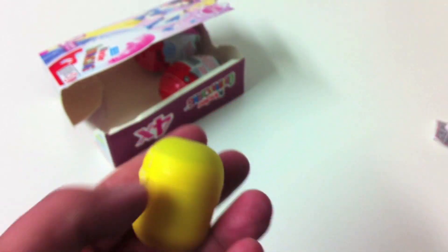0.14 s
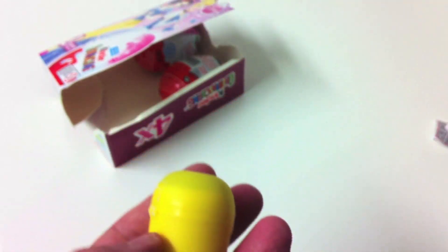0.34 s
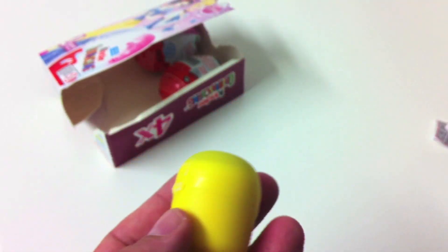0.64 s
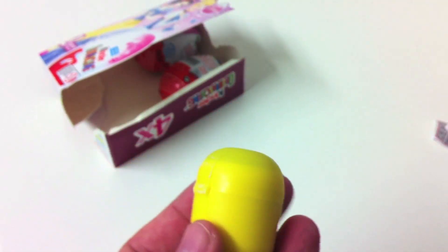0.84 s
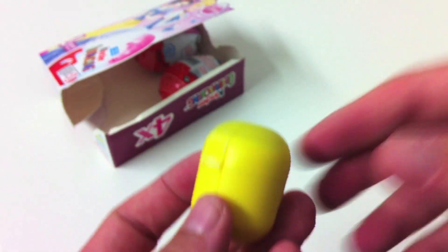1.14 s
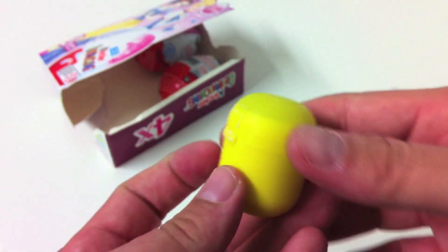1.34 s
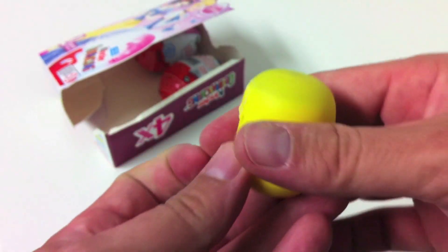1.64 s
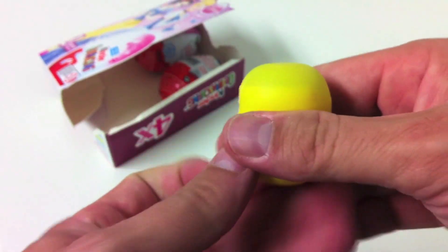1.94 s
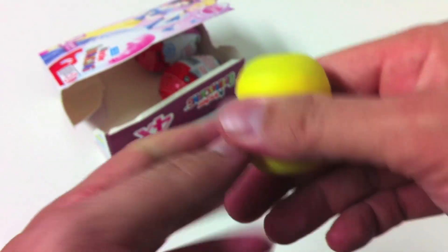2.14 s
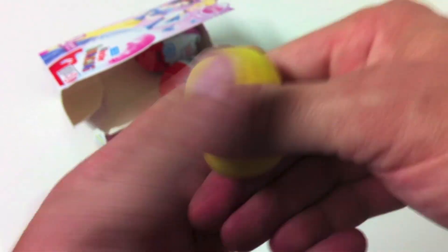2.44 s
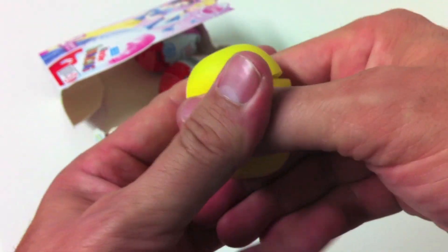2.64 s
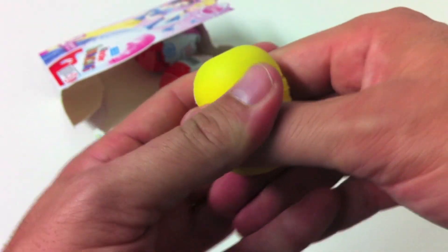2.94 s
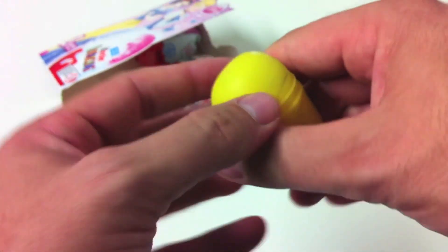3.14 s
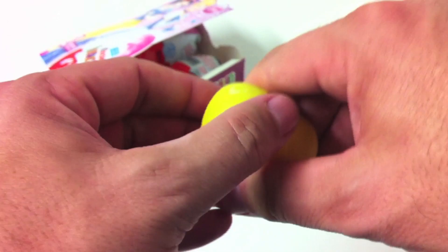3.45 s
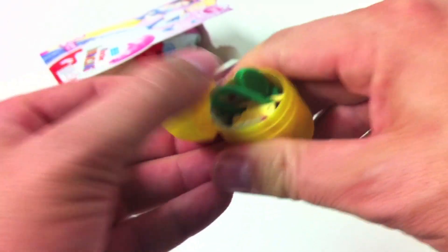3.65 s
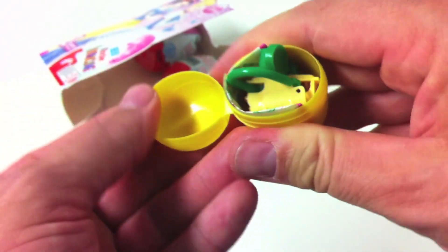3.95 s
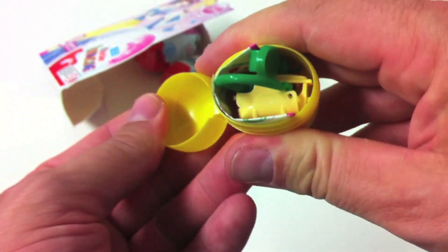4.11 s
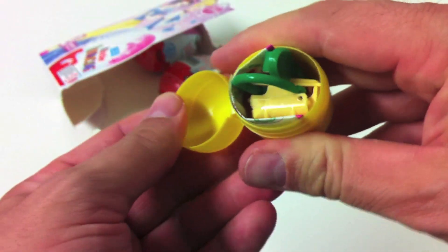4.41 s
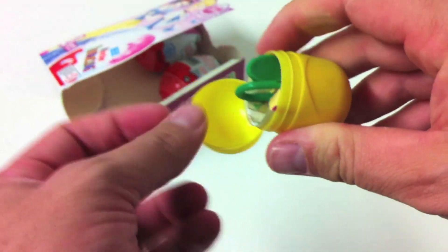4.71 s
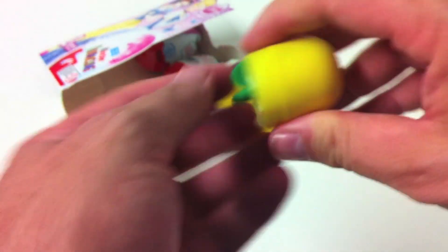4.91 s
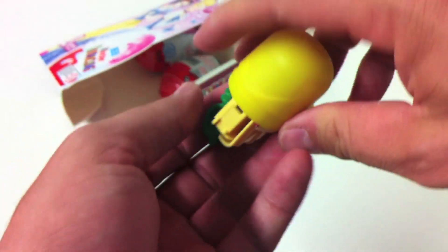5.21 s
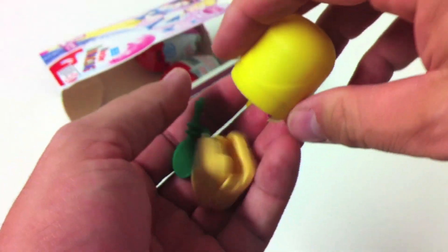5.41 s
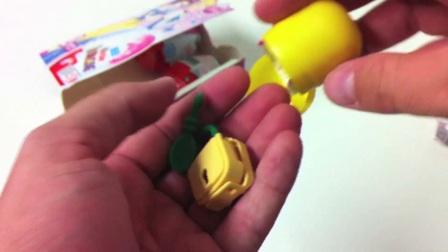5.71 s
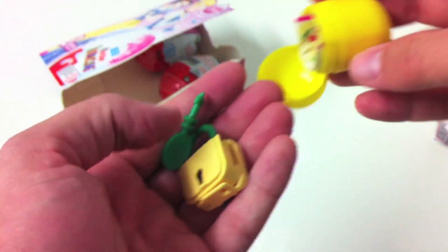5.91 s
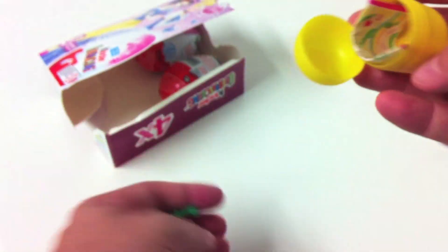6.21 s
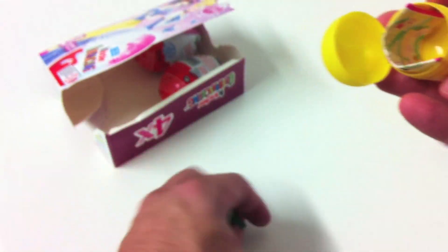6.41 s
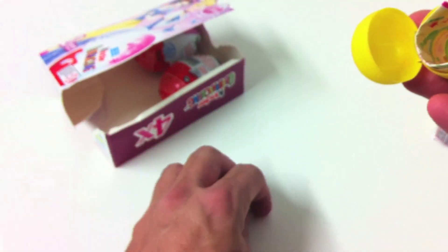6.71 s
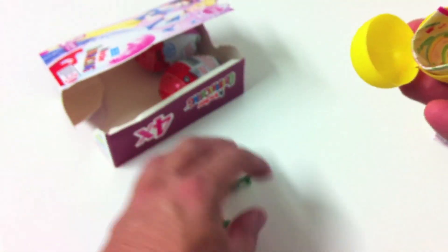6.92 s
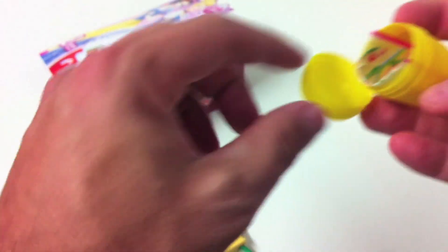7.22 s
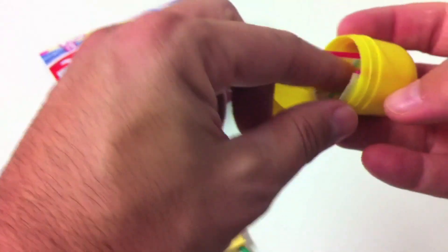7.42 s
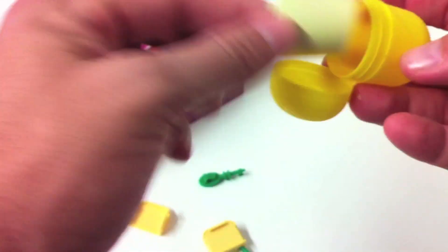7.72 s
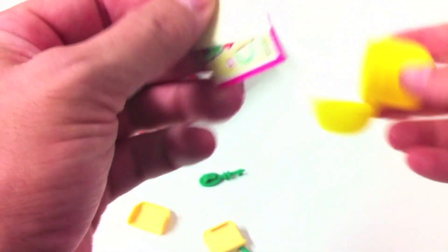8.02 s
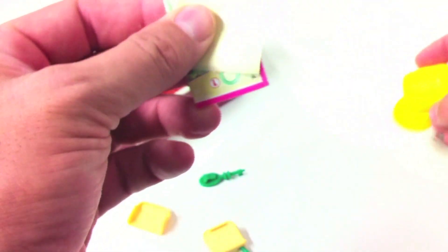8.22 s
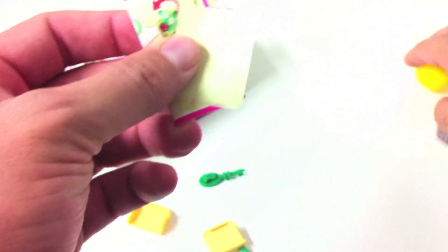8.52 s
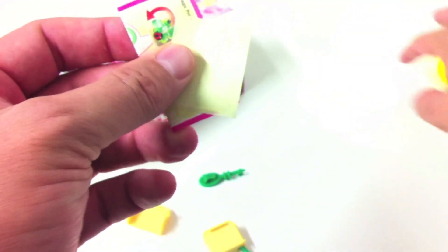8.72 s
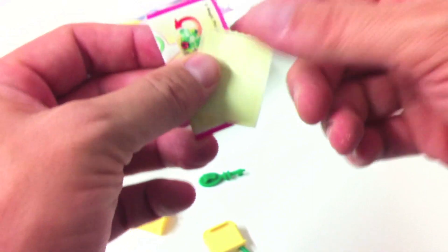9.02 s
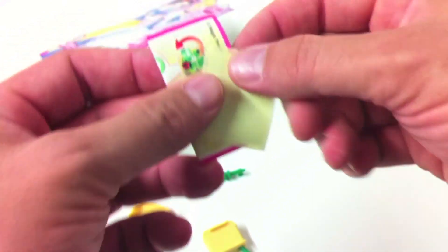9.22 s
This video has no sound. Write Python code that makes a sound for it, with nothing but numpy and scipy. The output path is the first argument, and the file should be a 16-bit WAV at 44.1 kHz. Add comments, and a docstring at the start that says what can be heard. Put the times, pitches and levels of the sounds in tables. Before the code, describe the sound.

A close microphone in a small room with short echoes picks up a quiet fan drone, mains hum and soft air noise. At about 0.4 to 0.6 seconds a hollow plastic capsule knocks, clicks and gives a dull bump on the table. Faint finger rubs follow from 1.4 to 2.1. At 2.7 the lid bursts open with a very loud, short, dry pop, then light knocks to 3.7. It stays quiet until about 5.0, when small hard parts click brightly and scrape out of the shell until 5.8. A soft knock comes at 6.0, light rubbing at 6.4, and at 6.8 pieces drop, bounce and chatter on the table until 7.25. A leaflet slides out with a hiss at 7.7, a hollow knock follows at 7.8, crisp paper snaps at 8.0, and the empty capsule scrapes and knocks from 8.5 to 8.7.

```python
"""Toy capsule popped open

Hands close to the microphone pop a plastic toy capsule, its small parts click and drop on a table, a leaflet
slides out and snaps open, and the empty capsule scrapes and knocks. Struck things are noise bursts ringing
resonances, rubbed things are trains of tiny slips, and the pop is two sets of decaying modes with a noisy rush.
Behind them a small room echoes and a fan drones over hum and air noise; peaks over a threshold turn the gain down."""
import sys
import numpy as np
from scipy import signal
from scipy.fft import rfft, irfft
from scipy.io import wavfile
from scipy.ndimage import uniform_filter1d, minimum_filter1d

SR = 44100
rng = np.random.default_rng(int(sys.argv[2]) if len(sys.argv) > 2 else 0)


def unload_wav(signal):
    """Save mono or channel-first audio to the path in sys.argv[1] as 16-bit WAV at rate SR, clipped to [-1, 1]."""
    wavfile.write(
        sys.argv[1],
        SR,
        np.round(np.clip(np.atleast_2d(signal).T, -1, 1) * 32767).astype(np.int16),
    )


N = 412335
TIME = np.arange(N) / SR


def from_db(db):
    """Decibels to an amplitude factor."""
    return 10 ** (np.asarray(db) / 20)


def rms_one(x):
    """Scale a sound to rms 1."""
    return x / np.sqrt(np.mean(x ** 2) + 1e-20)


def band(x, low_hz, high_hz, order=3):
    """Keep what lies between two frequencies."""
    sos = signal.butter(order, [low_hz, min(high_hz, .45 * SR)], "band", fs=SR, output="sos")
    return signal.sosfilt(sos, x)


def add(track, start_s, sound):
    """Mix a sound into a track from start_s on."""
    start = round(start_s * SR)
    track[start:start + len(sound)] += sound[:N - start]


def resonate(x, hz, width_hz):
    """A resonance with gain 1 at its top."""
    radius = np.exp(-np.pi * width_hz / SR)
    zeros = np.array([1, 0, -1]) * (1 - radius * radius) / 2
    poles = [1, -2 * radius * np.cos(2 * np.pi * hz / SR), radius * radius]
    return signal.lfilter(zeros, poles, x + 1e-18)


def body(x, resonances, broad_db):
    """Parallel resonances over a broad unpitched response."""
    ringing = sum(from_db(db) * resonate(x, hz, width_hz) for hz, width_hz, db in resonances)
    return from_db(broad_db) * x + ringing


def dying_modes(modes, t):
    """The free vibration of a struck body: sines that each fall 60 dB in their own t60."""
    return sum(from_db(db - 60 * t / t60_s) * np.sin(2 * np.pi * hz * t) for hz, db, t60_s in modes)


def friction(per_s, spread_db):
    """Tiny slips of uneven size at random moments; rms 1."""
    sizes = from_db(spread_db * np.minimum(rng.exponential(1, N), 4)) * rng.choice([-1, 1], N)
    return rms_one(sizes * (rng.random(N) < per_s / SR))


def strokes(rows, attack_s, slope_db_per_s, release_db_per_s):
    """Gain over time for rows of (start_s, length_s, level_db): each rises, holds on a slope and dies away."""
    gain = np.zeros(N)
    for start_s, length_s, level_db in rows:
        t = TIME[:round((length_s + .5) * SR)]
        held = slope_db_per_s * np.minimum(t, length_s)
        released = release_db_per_s * np.maximum(t - length_s, 0)
        add(gain, start_s, np.minimum(t / attack_s, 1) * from_db(level_db + held - released))
    return gain


def contacts(rows, resonances, broad_db, ring_db, ring_width_hz, tap_db, uneven_db, top_hz):
    """Each contact is a sharp tap and a dying burst of micro-impacts that ring the body."""
    out, t = np.zeros(N), TIME[:SR // 10]
    grits = rng.standard_normal((len(rows), len(t)))
    spots = rng.standard_normal((len(rows), len(resonances)))
    for (start_s, level_db, bass_db, treble_db, contact_s, *pitch_hz), grit, spot in zip(rows, grits, spots):
        force = grit * np.exp(-t / max(contact_s, 1e-4))
        force[0] += from_db(tap_db)
        # every spot that is struck favours other resonances
        struck = np.array(resonances) + np.outer(uneven_db * spot, [0, 0, 1])
        sound = body(force, struck, broad_db)
        for hz in pitch_hz:   # the piece that is hit adds its own note
            sound = sound + from_db(ring_db) * resonate(force, hz, ring_width_hz)
        sound = band(sound, 290, top_hz, order=1)
        # heavy contacts are rich in bass, hard ones in treble
        for low_hz, high_hz, colour_db in [(450, 1400, bass_db), (1400, 4500, 0), (4500, 16000, treble_db)]:
            # each band has the energy of 8 ms at its level
            part = rms_one(band(sound, low_hz, high_hz)) * np.sqrt(.008 / t[-1])
            add(out, start_s, from_db(level_db + colour_db) * part)
    return out


# air noise of the place, shape of its spectrum: (pitch_hz, relative density_db)
AIR = [(30, -18.5), (70, -20), (90, -17), (125, -10.5), (160, -5.5), (300, -0.5), (440, -4), (700, -12),
       (1000, -17), (2000, -21), (5500, -24), (8000, -26), (16000, -29.5)]
AIR_DB = -61.5   # rms
# mains hum: (pitch_hz, rms level_db)
HUM = [(49.5, -85.5), (100, -70.5)]
# fan drone: (pitch_hz, width_hz, rms level_db)
DRONE = [(148.2, 4.2, -70), (161.8, 4.7, -63), (174, 8.9, -71.5), (227.8, 25, -71.5), (299.3, 8.7, -69.5),
         (323.4, 3.3, -64.5)]


def background():
    """Steady air noise, mains hum and the wavering drone of a fan, which is noise in narrow resonances."""
    hz, density_db = np.transpose(AIR)
    bins_hz = np.arange(N // 2 + 1) * SR / N + 0.00084   # kept above zero for the logarithm
    colour = from_db(np.interp(np.log(bins_hz), np.log(hz), density_db))
    air = from_db(AIR_DB) * rms_one(irfft(rfft(rng.standard_normal(N)) * colour, N))
    hum = sum(from_db(db) * np.sqrt(2) * np.sin(2 * np.pi * hz * TIME) for hz, db in HUM)
    white = rng.standard_normal(N + SR)   # the extra second lets the resonances settle
    drone = 0
    for hz, width_hz, level_db in DRONE:
        # two filters in a row, each twice as wide as width_hz
        narrow = resonate(resonate(white, hz, 2 * width_hz), hz, 2 * width_hz)[SR:]
        drone = drone + from_db(level_db) * rms_one(narrow)
    return air + hum + drone


# reverberation of the small room: (pitch_hz, t60_s, relative level_db)
ROOM = [(124.6, .4, 0.5), (300, 0.8, 3.5), (700, 0.43, 2), (1389, 0.53, -2), (2800, .39, 0),
        (5660, .37, -2.5), (11000, 0.28, -1), (16000, 0.15, 3.5)]


def room(x, first_echo_s, build_s):
    """Diffuse echoes build up, then die away band by band."""
    t, tail = TIME[:SR * 3 // 4], 0
    hz, t60_s, level_db = np.transpose(ROOM)
    edges_hz = np.geomspace(90, 18000, 12)
    white = rng.standard_normal((2, len(t)))
    for k, (low_hz, high_hz) in enumerate(zip(edges_hz, edges_hz[1:])):
        centre = np.log(low_hz * high_hz) / 2
        decay_s, band_db = [np.interp(centre, np.log(hz), column) for column in (t60_s, level_db)]
        decay = np.exp(-np.log(1000) * t / decay_s)
        tail = tail + band(white[k % 2], low_hz, high_hz) * from_db(band_db) * decay
    tail = tail * np.clip((t - first_echo_s) / build_s, 0, 1)
    return signal.fftconvolve(x, tail / np.sqrt(np.sum(tail ** 2)))[:N]


# fingers rubbing on the capsule, its parts and the leaflet: (start_s, length_s, level_db before the mix)
RUBS = [(1.405, .04, -63.5), (1.52, .04, -70), (1.685, .03, -67.5), (2.055, 0.019, -62.5),
        (3.62, .025, -70), (3.95, .05, -67.5), (4.98, 0.036, -70), (5.06, 0.02, -50.5), (5.12, 0.098, -64),
        (5.40, 0.067, -65), (5.49, 0.037, -58), (6.41, 0.14, -61), (7.43, 0.026, -62.5), (8.34, 0.035, -69),
        (8.47, .025, -68), (8.85, 0.027, -70)]
# resonances of the small plastic parts: (pitch_hz, width_hz, level_db)
PARTS = [(1660, 180, -24), (2190, 230, -3), (3100, 170, -16), (4170, 300, -4), (4780, 310, -1.5),
         (5470, 290, 3), (5900, 150, 0), (7340, 400, 0.5), (8160, 270, -4), (9620, 530, -2.5),
         (10740, 310, -5)]


def rubbing():
    """Skin and plastic slip over each other in fine grains that ring the parts."""
    grains = body(friction(per_s=1900, spread_db=3.5), PARTS, broad_db=-1)
    gain = strokes(RUBS, attack_s=0.016, slope_db_per_s=0, release_db_per_s=352)
    return gain * rms_one(band(grains, 1300, 15000))


# the toy and then the leaflet slide out, and the empty capsule is slid aside; levels are before the mix:
# (start_s, length_s, hollow scrape level_db, hiss level_db, hollow pitch_hz)
SLIDES = [(4.981, 0.1, -67, -82, 1990), (5.12, 0.085, -65, -68, 1600), (5.338, 0.071, -65, -78, 1650),
          (5.533, 0.05, -68, -80, 1990), (5.708, 0.037, -70, -68, 2040), (7.697, 0.1, -59, -53, 1770),
          (8.525, .2, -57, -56.5, 1640)]
# walls of the opened shell: (pitch_hz, width_hz, level_db)
OPEN_SHELL = [(770, 410, -9), (1230, 550, -2), (2970, 430, -2)]
SLIDE_ATTACK_S, SLIDE_RELEASE_DB_PER_S = 0.017, 300
# a slide starts hissy and turns hollow and higher
SCRAPE_GROWTH_DB_PER_S, HISS_FADE_DB_PER_S, GLIDE_HZ_PER_S = 5, 56, 500


def slides(hollow_width_hz, wall_db):
    """Friction in uneven catches hisses and sounds the hollow, its pitch rising as the opening is covered."""
    start_s, length_s, scrape_db, hiss_db, hollow_hz = np.transpose(SLIDES)
    scrape = strokes(zip(start_s, length_s, scrape_db),
                     SLIDE_ATTACK_S, SCRAPE_GROWTH_DB_PER_S, SLIDE_RELEASE_DB_PER_S)
    hiss = strokes(zip(start_s, length_s, hiss_db),
                   SLIDE_ATTACK_S, -HISS_FADE_DB_PER_S, SLIDE_RELEASE_DB_PER_S)
    current = np.maximum(np.searchsorted(start_s, TIME) - 1, 0)
    elapsed_s = np.clip(TIME - start_s[current], 0, length_s[current])
    pitch_hz = hollow_hz[current] + GLIDE_HZ_PER_S * elapsed_s
    catches = from_db(2 * rms_one(band(rng.standard_normal(N), 9.7, 78, order=2)))
    slips = friction(per_s=1500, spread_db=4)
    # a resonance that follows the pitch: shift the slips down, smooth them, shift back up
    turn = np.exp(2j * np.pi * np.cumsum(pitch_hz) / SR)
    smoothed = signal.lfilter([1], [1, -np.exp(-np.pi * hollow_width_hz / SR)], slips / turn)
    hollow = rms_one(band(np.real(turn * smoothed), 940, 2800))
    walls = rms_one(band(body(slips, OPEN_SHELL, broad_db=-10.0), 380, 5200))
    dry_hiss = rms_one(band(friction(per_s=4300, spread_db=-1), 2400, 10500, order=1))
    return catches * (scrape * rms_one(hollow + from_db(wall_db) * walls) + hiss * dry_hiss)


# creases of the leaflet snapping:
# (start_s, mid-band level_db, bass_db re mid, treble_db re mid, contact_s)
CREASES = [(8.017, -80, -13, 23, 0.0055), (8.0245, -51, -15, 7, 0.0048), (8.032, -44.5, -4, 2, 0.0033),
           (8.0499, -51, -21, 5, 0.001), (8.1382, -60, -5.5, -12, 0.0022)]
# resonances of the paper: (pitch_hz, width_hz, level_db)
PAPER = [(1300, 700, -24), (2700, 900, -18), (8040, 1100, 3), (9600, 1200, 14)]


def creases():
    """The folds of the leaflet snap, ringing the broad, bright resonances of the paper."""
    return contacts(CREASES, PAPER, broad_db=4, ring_db=0, ring_width_hz=300,
                    tap_db=7, uneven_db=4, top_hz=8000)


# knocks on the hollow capsule:
# (start_s, mid-band level_db, bass_db re mid, treble_db re mid, cavity pitch_hz)
KNOCKS = [(0.425, -42.5, 3.5, -9.5, 1150), (0.5404, -50, 2, -11.5, 1320), (2.947, -53, 10, -10, 1190),
          (3.0442, -66.5, 7.5, -8, 1091), (3.6422, -59.5, 8, -6, 1210), (3.6535, -59, -1, 9.5, 1520),
          (6.0072, -54.5, -2.5, -11, 1837), (7.8045, -41, -15, -4.5, 1910), (8.7184, -56, 12, -20, 1690),
          (8.729, -59, 11, -3.5, 1810)]
# resonances of the capsule's shell: (pitch_hz, width_hz, level_db)
SHELL = [(1640, 180, -7), (2570, 210, -2), (3670, 250, -11), (5550, 200, -0.5), (8000, 720, -7)]
KNOCK_CONTACT_S = 0.003


def knocks():
    """Fingers and contents knock on the hollow capsule, whose cavity adds a note to the ringing shell."""
    rows = [(start_s, level_db, bass_db, treble_db, KNOCK_CONTACT_S, hz)
            for start_s, level_db, bass_db, treble_db, hz in KNOCKS]
    return contacts(rows, SHELL, broad_db=-5, ring_db=13.5, ring_width_hz=97,
                    tap_db=15, uneven_db=2.5, top_hz=12000)


def echoed(x, delay_s, db):
    """The table top throws one early copy back."""
    return x + from_db(db) * np.interp(TIME - delay_s, TIME, x, left=0)


# small plastic parts clicking together, the first a click on the capsule that rings a note of its rim: #
# (start_s, mid-band level_db before the echo, treble_db re mid, ring pitch_hz)
PART_CLICKS = [(0.5718, -36, -12, 2530), (4.7816, -65.5, -4, 5340), (5.063, -55.5, -4, 4070),
               (5.086, -56, 7, 5510), (5.095, -47, -10, 5460), (5.1014, -39.5, -2, 5230),
               (5.109, -54, -4, 4710), (5.3525, -57.5, -3, 2190), (5.4077, -57.5, -7, 4250),
               (5.4673, -43.5, 7.5, 5900), (5.4905, -54, 17, 5440), (5.499, -53.5, 9, 5540),
               (5.513, -54, -4, 4330), (5.56, -61.5, 8.5, 5560), (5.6876, -53.5, 1, 3890),
               (5.8342, -61, -3, 3740), (6.241, -65, -4, 2240), (6.4159, -54, 6, 3760),
               (6.4827, -67, 20, 8700), (6.5234, -56.5, 5.5, 6290)]
PART_CONTACT_S, PART_BASS_DB = 0.003, -14.5   # the parts are light: little bass re mid


def part_clicks():
    """Small hard parts click together just above the table; the first click rings a note of the capsule's rim."""
    rows = [(start_s, level_db, PART_BASS_DB, treble_db, PART_CONTACT_S, hz)
            for start_s, level_db, treble_db, hz in PART_CLICKS]
    clicks = contacts(rows, PARTS, broad_db=-10, ring_db=8.5, ring_width_hz=570,
                      tap_db=-1, uneven_db=1.5, top_hz=10900)
    return echoed(clicks, delay_s=0.0047, db=-5.5)


# pieces landing and bouncing on the table: (start_s, mid-band level_db, ring pitch_hz)
TABLE_HITS = [(0.617, -44, 1250), (6.766, -49.5, 7940), (6.777, -43, 4000), (6.798, -25, 2140),
              (6.811, -40.5, 1450), (6.8393, -33, 2780), (6.863, -43, 3870), (6.8971, -35, 2380),
              (6.9682, -48.5, 7860), (6.978, -52, 8250), (6.988, -54.5, 9300), (7.1075, -36.5, 7840),
              (7.1415, -34.5, 3290), (7.1438, -47.5, 11170), (7.165, -49, 7950), (7.2027, -49, 10900),
              (7.2115, -38, 2240), (7.25, -51.5, 8700)]
# a soft, heavy contact on the table:
# (start_s, mid-band level_db, bass_db re mid, treble_db re mid, contact_s, ring pitch_hz, board level_db)
BUMPS = [(0.579, -41, 8.5, -2.5, 0.0097, 770, -39.5)]
# dropped parts chatter, lose energy and come to rest: (start_s, length_s, level_db)
CHATTERS = [(6.81, 0.11, -49.5), (6.965, 0.12, -49.5), (7.12, 0.14, -44)]
# resonances of the table top: (pitch_hz, width_hz, level_db)
TABLE = [(610, 41, 4.5), (945, 88, 5), (1380, 470, 3), (2060, 350, 2.5), (2790, 220, 1), (3790, 230, 2),
         (5480, 240, -8), (7120, 300, -23), (8000, 350, 0), (8620, 200, -1), (11000, 260, -8)]
# modes of the table's board: (pitch_hz, level_db, t60_s)
BOARD = [(141, -4.5, 0.2), (160.6, -4.5, 0.2), (210, -15, 0.075), (276, -6, 0.062), (346, -7.5, .07),
         (453, 6, 0.032)]
TABLE_CONTACT_S, TABLE_BASS_DB = 0.0036, -7
# smaller pieces ring higher and land brighter; at EVEN_HZ treble equals mid
TREBLE_DB_PER_OCTAVE, EVEN_HZ = 8.5, 4020
BOARD_GIVE_DB = -26.5   # how strongly a landing shakes the board, re its mid band


def table():
    """Landings, chatter and a dull bump on the table top; each landing and the bump also shake the board."""
    landings = [(start_s, level_db, TABLE_BASS_DB, TREBLE_DB_PER_OCTAVE * np.log2(hz / EVEN_HZ),
                 TABLE_CONTACT_S, hz) for start_s, level_db, hz in TABLE_HITS]
    hits = contacts([row[:-1] for row in BUMPS] + landings, TABLE, broad_db=-0.5, ring_db=13.0,
                    ring_width_hz=310, tap_db=7.5, uneven_db=2.5, top_hz=10900)
    rattle = rms_one(band(body(friction(per_s=1200, spread_db=4.0), TABLE, broad_db=-9), 450, 14000))
    chatter = strokes(CHATTERS, attack_s=0.032, slope_db_per_s=-22, release_db_per_s=155) * rattle
    board, t = np.zeros(N), TIME[:SR // 3]
    # neighbouring modes start in opposite directions
    thud = dying_modes(BOARD[::2], t) - dying_modes(BOARD[1::2], t)
    shakes = [(row[0], row[-1]) for row in BUMPS]
    shakes += [(start_s, level_db + BOARD_GIVE_DB) for start_s, level_db, hz in TABLE_HITS]
    for start_s, board_db in shakes:
        add(board, start_s, from_db(board_db) * thud)
    low_ring = from_db(12.5) * resonate(hits, 280, 68)
    return hits + chatter + board + low_ring


# air bursting out sideways as the halves part: (pitch_hz, width_hz, level_db)
BURST = [(190.4, 80, 1.5), (746, 430, 3), (1290, 790, -3), (2509, 890, -19.5), (5400, 1900, -15)]


def burst(db, decay_s):
    """The noisy rush of the pop spreads sideways and is heard mostly off the walls."""
    out, t = np.zeros(N), TIME[:SR // 10]
    rush = rng.standard_normal(len(t)) * np.exp(-t / decay_s)
    rush = rms_one(band(body(rush, BURST, broad_db=-21), 135, 14000, order=4))
    add(out, POP[0][0], from_db(db) * rush)   # with the first jerk of the pop
    return out


# the lid jumps its rim, then the cavity pops open: (start_s, rim level_db, cavity level_db)
POP = [(2.7090, -1, -18), (2.7104, -4, -26.5), (2.7122, -8, -1)]
# modes of the rim and shell: (pitch_hz, level_db, t60_s)
RIM = [(1256, -4, 0.015), (1600, -6.5, 0.013), (2470, -7, .009), (2840, -20, 0.0074), (3670, -23, .009),
       (4000, -21.5, .009), (5230, -15, 0.012), (5600, -12.5, 0.011), (6080, -20.5, 0.009),
       (7160, -22, .006), (8150, -22.5, .006), (13400, -21.5, 0.002)]
# modes of the air in the opening halves: (pitch_hz, level_db, t60_s)
CAVITY = [(171.5, -19.5, 0.055), (214.1, -21, .04), (330, -26.5, 0.044), (570, -14, 0.014),
          (817, -5.5, .019), (1020, -15.5, .02)]


def pop(crack_db, crack_s, crack_top_hz):
    """The lid slips over its rim in quick gritty jerks and lets the air inside ring."""
    out, t = np.zeros(N), TIME[:SR // 10]
    rim, cavity = dying_modes(RIM, t), dying_modes(CAVITY, t)
    for start_s, rim_db, cavity_db in POP:
        grit = rng.standard_normal(len(t)) * np.exp(-t / crack_s)
        crack = from_db(crack_db) * band(grit, 720, crack_top_hz, order=1)
        add(out, start_s, from_db(rim_db) * (rim + crack) + from_db(cavity_db) * cavity)
    return band(out, 160, 15000, order=5)   # the microphone rolls off the deep bass


def scene():
    """Everything as it reaches the microphone: direct sound, its echoes in the room, and the background."""
    # (sound, direct_db, room_db): what is held near the microphone is drier than the table
    sources = [
        (burst(db=-31.5, decay_s=0.0034), -14, -4),
        (knocks(), 0, -8),
        (part_clicks(), 0, -10),
        (creases(), 0, -9),
        (table(), 0, -3),
        (rubbing(), -1, -8),
        (slides(hollow_width_hz=360, wall_db=0.5), -1, -7)]
    direct = pop(crack_db=-8, crack_s=0.0021, crack_top_hz=4440)   # the pop itself is not sent to the room
    direct = direct + sum(from_db(direct_db) * sound for sound, direct_db, room_db in sources)
    sent = sum(from_db(room_db) * sound for sound, direct_db, room_db in sources)
    return (direct + room(sent, first_echo_s=0.0026, build_s=0.004) + background())[None]


def gain_control(x, threshold_db, release_db_per_s):
    """A peak over the threshold turns the gain down just ahead of it; it creeps back slowly."""
    peak_db = 20 * np.log10(np.abs(x).max(axis=0) + 1e-9)
    over_db = np.maximum(peak_db - threshold_db, 0)
    recovery_db = release_db_per_s * TIME
    cut_db = np.maximum.accumulate(over_db + recovery_db) - recovery_db
    # look about 10 ms ahead, then smooth the step
    return x * from_db(uniform_filter1d(minimum_filter1d(-cut_db, size=883), size=441))


def record(dry):
    """Gain control, then a steep cut of everything above 16 kHz."""
    levelled = gain_control(dry, threshold_db=-2.5, release_db_per_s=2.0)
    return signal.sosfilt(signal.ellip(12, .1, 80, 16000, fs=SR, output="sos"), levelled)


dry = scene()
out = record(dry)
unload_wav(out)
```